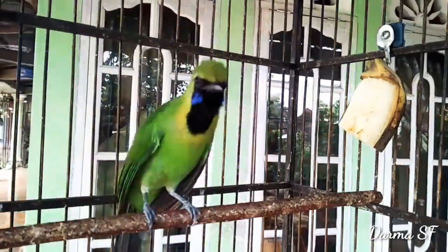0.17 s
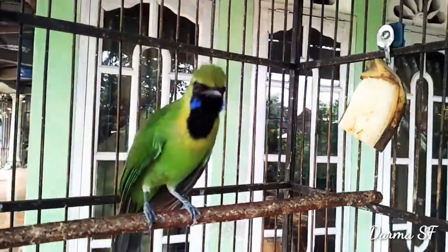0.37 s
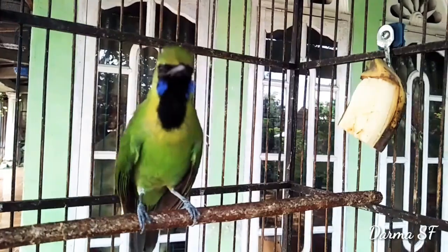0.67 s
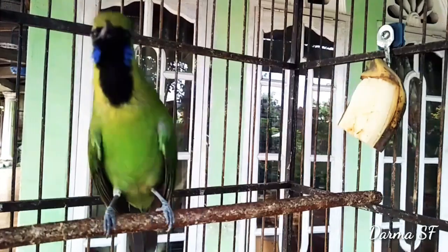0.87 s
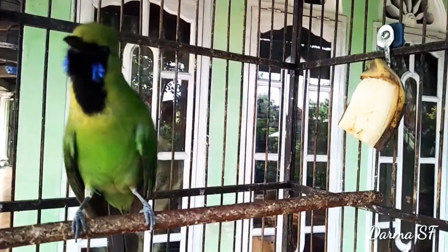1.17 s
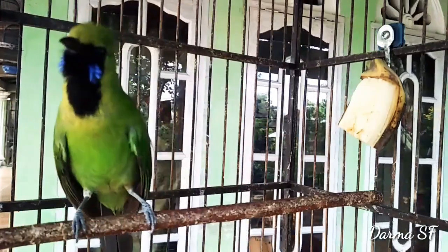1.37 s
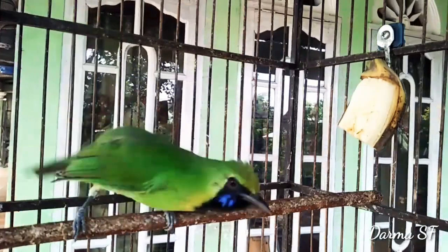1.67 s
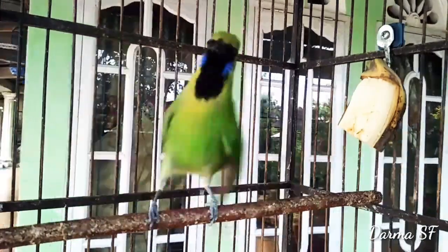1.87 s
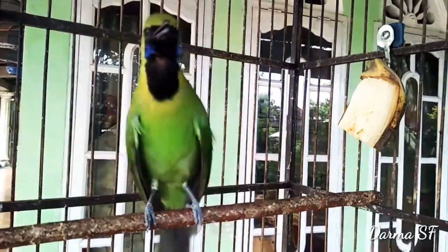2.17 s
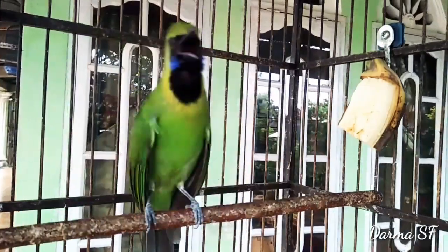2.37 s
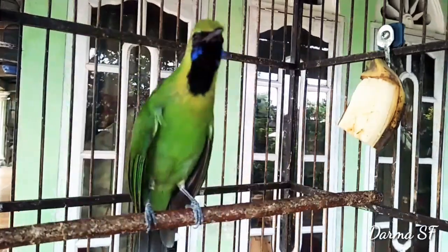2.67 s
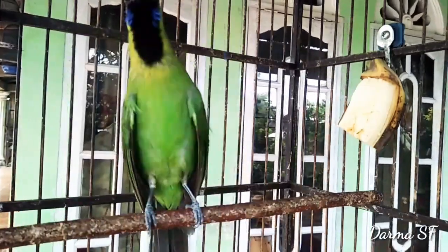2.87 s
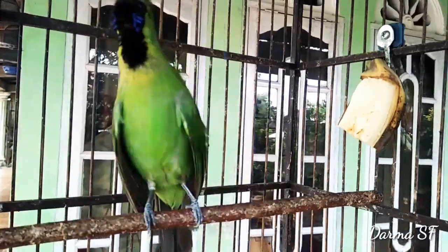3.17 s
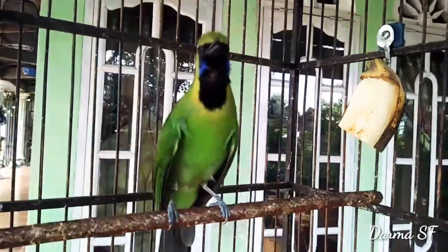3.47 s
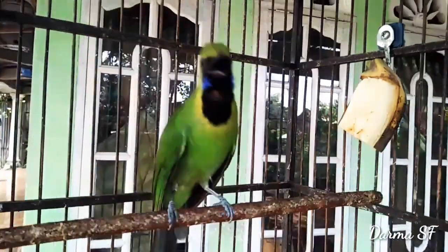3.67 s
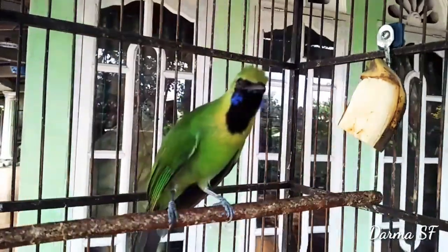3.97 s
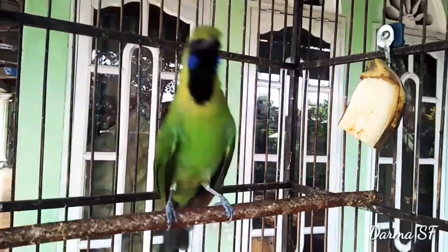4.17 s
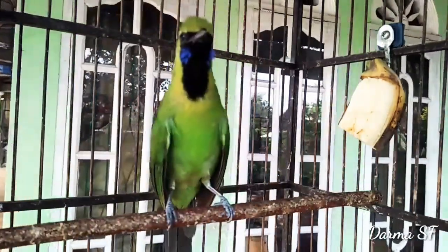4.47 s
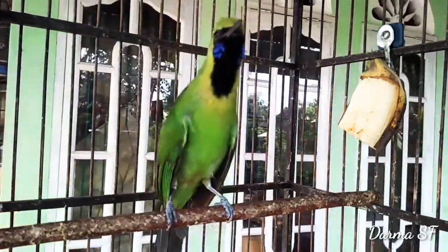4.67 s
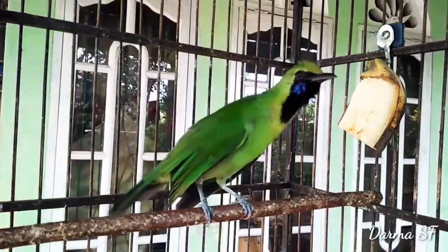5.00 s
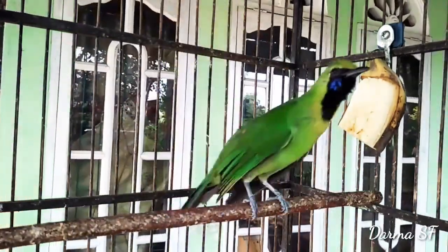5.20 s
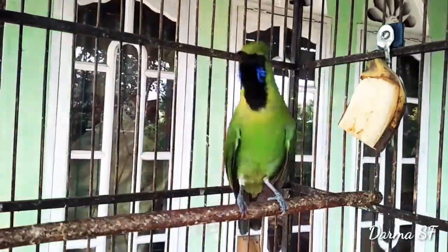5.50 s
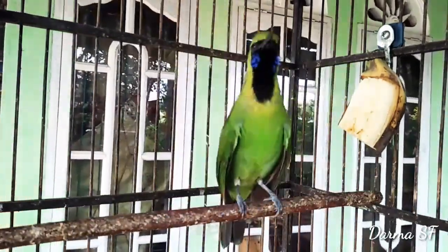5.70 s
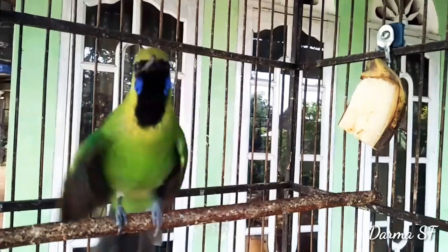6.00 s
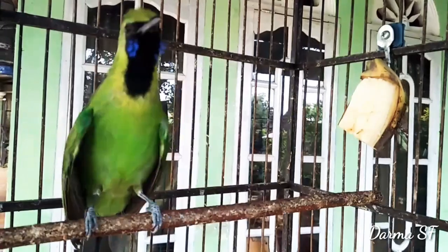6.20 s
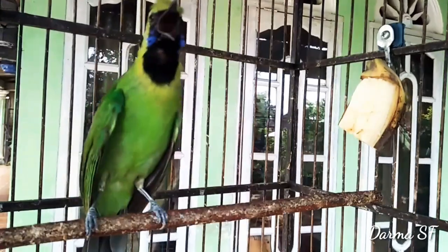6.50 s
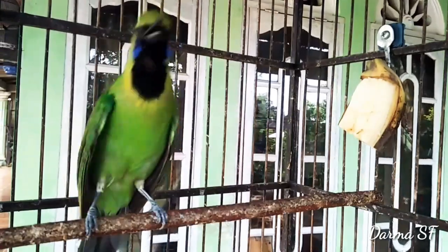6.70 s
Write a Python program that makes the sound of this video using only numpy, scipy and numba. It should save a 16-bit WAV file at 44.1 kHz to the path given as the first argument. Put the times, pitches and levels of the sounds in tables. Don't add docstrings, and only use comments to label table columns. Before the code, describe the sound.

A small songbird at arm's length from a phone microphone opens with a short loud whistle phrase, fluttering upward then stepping down. After a gap with distant birds chirping, it chatters eight rapid, rising, raspy notes, pauses, repeats a similar run of seven, and ends with five harsher, higher notes. Soft feather rustles and tiny claw ticks fall between. A hard-walled porch adds a short ring; low traffic rumbles far off.

```python
import sys
import numpy as np
from scipy import signal
from scipy.fft import rfft, irfft, next_fast_len
from scipy.io import wavfile
from scipy.ndimage import uniform_filter1d, map_coordinates
from numba import njit

SR = 44100
rng = np.random.default_rng(int(sys.argv[2]) if len(sys.argv) > 2 else 0)


def makeup_ratio(level_db):
    decades = np.asarray(level_db, float) / 20
    return 10 ** decades


def output_pcm(signal):
    pcm = np.clip(np.atleast_2d(signal).T, -1, 1) * 32767
    wavfile.write(sys.argv[1], SR, np.round(pcm).astype(np.int16))


N = 302085
T = np.arange(N) / SR


def colour(x, points):
    hz, db = np.transpose(points)
    size = next_fast_len(len(x))
    bins = np.maximum(np.arange(size // 2 + 1) * SR / size, 1)
    gain = makeup_ratio(np.interp(np.log(bins), np.log(hz), db))
    return irfft(rfft(x, size) * gain, size)[:len(x)]


def unit(x):
    return x / np.sqrt(np.mean(x ** 2))


def noise(points, size=N):
    return colour(rng.standard_normal(size), points)


def walk(rate_hz, size=N):
    hold = int(SR / rate_hz) + 1
    steps = np.repeat(rng.standard_normal(size // hold + 2), hold)
    return unit(uniform_filter1d(uniform_filter1d(steps, hold), hold)[:size])


def add(out, s, hz, partials, edge_s):
    i = int(s * SR)
    size = min(len(hz), N - i)
    phase = 2 * np.pi * (np.cumsum(hz) / SR + rng.random())
    from_start = np.arange(len(hz)) + i * (i == 0)
    to_end = np.arange(len(hz))[::-1]
    fade = np.clip(np.minimum(from_start, to_end) / (edge_s * SR), 0, 1)
    tone = 0
    for k, gain in enumerate(partials, 1):
        tone = tone + gain * np.sin(k * phase) * (k * hz < .45 * SR)
    out[i:i + size] += (np.sqrt(2) * tone * fade)[:size]


def read(table):
    s, *columns = np.transpose(table)
    t = np.arange(s[0], s[-1], 1 / SR)
    return t, [np.interp(t, s, c) for c in columns]


def bursts(table):
    total = 0
    for s, hold_s, db, fade in table:
        opening = 799.5 * np.maximum(s - T, 0)
        fading = fade * np.maximum(T - s - hold_s, 0)
        total = total + makeup_ratio(db - opening - fading)
    return total


# (time [s], pitch [Hz], level [dB], second partial [dB], third partial [dB])
WHISTLE_PATHS = [
    [(0, 3658, -11, -39.5, -34), (.025, 3653, -9.5, -33, -26), (.048, 3982, -8, -29, -39.5),
     (.061, 4459, -14, -10.5, -24.5), (.071, 4807, -21, -23, -36)],
    [(.134, 4271, -47.5, -41, -61), (.142, 4100, -31.5, -35.5, -42), (.152, 3724, -16, -36.5, -51),
     (.166, 3440, -10, -31.5, -45), (.176, 3212, -15, -41.5, -21), (.19, 3257, -17.5, -37.5, -14),
     (.204, 3263, -8.5, -34, -16), (.214, 3254, -16, -42.5, -30), (.226, 3323, -32.5, -60.5, -48)],
    [(.274, 3424, -32.5, -52, -49.5), (.28, 3369, -23, -51, -43), (.2895, 3340, -30, -46, -40),
     (.293, 2944, -13.5, -55, -33), (.304, 2694, -7.5, -44, -35.5), (.313, 2622, -15, -46, -40),
     (.32, 2423, -15.5, -52.5, -52.5), (.335, 2189, -18, -51.5, -47), (.350, 2165, -28.5, -59.5, -63.5)],
]
# (end [s], rate [Hz], pitch depth [0-1], level depth [0-1])
WHISTLE_FLUTTER = (0.054, 170, 0.035, 0.14)


def whistles():
    out = np.zeros(N)
    end_s, rate_hz, depth, throb = WHISTLE_FLUTTER
    for path in WHISTLE_PATHS:
        t, (hz, *dbs) = read(path)
        size = len(t)
        wave = np.sin(2 * np.pi * rate_hz * (t - .0015)) * np.clip((end_s - t) / 0.011, 0, 1)
        hz = uniform_filter1d(hz, 150, mode="nearest")
        hz = hz * (1 + depth * wave + 0.0024 * walk(300, size))
        lower = [makeup_ratio(db) * (1 + throb * wave + 0.13 * k * walk(500, size)) for k, db in enumerate(dbs, 1)]
        upper = [makeup_ratio(dbs[2] + below_db) * walk(600, size) for below_db in (-27, -9.5, -8.5)]
        add(out, t[0], hz, lower + upper, .003)
        i = int(t[0] * SR)
        out[i:i + size] += makeup_ratio(dbs[0] - 18) * noise(HISS_COLOUR, size)
    return out


CHATTER_PARTIALS = (-2, -26.5, -19, -28.5, -28, -27.5)


def sweep(out, s, top_hz, start_hz, end_hz, rise_s, fall_s, db):
    t = np.arange(-rise_s, fall_s, 1 / SR)
    size = len(t)
    rough = np.clip((top_hz - 2900) / 2800, .05, 1)
    bent = np.where(t > 0, fall_s * (np.abs(t) / fall_s) ** .8, t)
    hz = np.exp(np.interp(bent, [-rise_s, 0, fall_s], np.log([start_hz, top_hz, end_hz])))
    hz = uniform_filter1d(hz, 90) * (1 + 0.054 * rough * walk(900, size))
    swell_db = np.interp(t, [-rise_s, -.3 * rise_s, 0.58 * fall_s, fall_s],
                         [-14 - 5 * rough, -2 + 0.96 * rough, -6 * rough ** 2, -5 - 18 * rough])
    swell = makeup_ratio(db + swell_db + 3.8 * np.tanh(walk(350, size)))
    steady = [1 - 0.13 * rough] + [0.5 * (1 - rough)] * (len(CHATTER_PARTIALS) - 1)
    rattle = [c + np.sqrt(1 - c * c) * walk(3000, size) for c in steady]
    add(out, s - rise_s, hz, [swell * r * makeup_ratio(p) for r, p in zip(rattle, CHATTER_PARTIALS)], 0.0035)
    after = T - s + rise_s
    opening = np.clip(after / (0.8 * rise_s), 0, 1) ** 2
    closing = np.clip((rise_s + 0.02774 - after) / 0.021, 0, 1) ** 2.1
    return opening * closing * makeup_ratio(db - 17.5 + 27.52 * rough)


# (time at the top [s], top [Hz], start [Hz], level [dB])
CHATTER_NOTES = [(2.198, 3357, 1253, -10), (2.278, 3600, 1187, -11.5), (2.357, 3948, 1198, -11.5),
                 (2.438, 4180, 1208, -12.5), (2.519, 4490, 1210, -12.5), (2.6, 5373, 2012, -13),
                 (2.671, 5500, 2185, -11.5), (2.751, 5687, 2310, -15), (3.608, 3700, 1203, -12.5),
                 (3.697, 3700, 1189, -10.5), (3.779, 4200, 1194, -11), (3.860, 4300, 1210, -10.5),
                 (3.943, 4600, 1333, -12), (4.021, 5375, 2031, -11), (4.095, 5746, 2278, -14),
                 (6.586, 5270, 1274, -11), (6.641, 5811, 1300, -13), (6.699, 5834, 1090, -13),
                 (6.761, 5600, 2345, -14), (6.841, 5500, 2203, -14)]
CHATTER_FALLS = (.022, .022, .019, 0.015, 0.015, 0.012, .011, .011, 0.025, .021, .016, 0.016, 0.015, 0.0096,
                 .011, .011, .011, .011, .011, .011)
# (first pitch [Hz], last pitch [Hz], length [s], level [dB])
CHATTER_TRAILS = [(2969, 2200, .016, -18), (2895, 2400, 0.016, -20), (2949.4, 2300, .015, -15.5),
                  (2779.8, 2200, .013, -16), (3000, 2600, 0.0089, -16), (4300, 2300, 0.0095, -20),
                  (4300, 2500, .011, -19.5), (4469.5, 2700, 0.013, -26), (2950, 2200, 0.02, -19.5),
                  (2927.5, 2200, 0.017, -17.5), (2868, 2500, 0.013, -13.5), (2875, 2300, 0.0121, -15),
                  (3700, 2300, 0.00852, -17), (4496.4, 2400, 0.0097, -22), (4000, 3500, 0.012866, -15.5),
                  (4100, 2100, .011, -18), (4457.6, 3300, 0.01, -24.5), (4470, 2300, .011, -23),
                  (4200, 3600, .009, -20.5), (4500, 2500, .011, -22)]
# (frequency [Hz], level [dB])
THROAT_COLOUR = [(300, -25.5), (1000, -11), (1700, -10.5), (2250, -2.5), (2750, -0.5), (3300, -3.5),
                 (4550, -3), (5150, -12), (5500, -5.5), (7000, -8), (9700, 1.5), (12000, -5.5),
                 (14500, -13)]


def chatter():
    relaxed_hz, strained_hz = 3700, 5500
    out, easy_rasp, forced_rasp = np.zeros(N), np.zeros(N), np.zeros(N)
    for note, fall_s, trail in zip(CHATTER_NOTES, CHATTER_FALLS, CHATTER_TRAILS):
        s, top_hz, start_hz, db = note
        trail_hz, end_hz, trail_s, trail_db = trail
        strain = np.clip((top_hz - relaxed_hz) / (strained_hz - relaxed_hz), 0, 1)
        rise_s = .005 + .006 * np.log2(top_hz / start_hz)
        rasp = sweep(out, s, top_hz, start_hz, 1600, rise_s, fall_s, db)
        easy_rasp += np.sqrt(1 - strain) * rasp
        forced_rasp += np.sqrt(strain) * rasp
        sweep(out, s + 0.011, trail_hz, 0.73 * trail_hz, end_hz, 0.0021, trail_s, trail_db)
    forced_noise = noise([(1500, -19.5), (3000, -17), (3700, 2), (4300, 7), (5200, 1.5), (6000, -7.0),
                          (14000, -4)])
    easy_noise = noise([(1500, -10), (2600, -7), (3500, 15.5), (4300, -9), (6000, -6.5), (10000, 0.5),
                        (14000, -15.5)])
    rasps = (easy_rasp * easy_noise + forced_rasp * forced_noise) * makeup_ratio(4.7 * np.tanh(walk(400)))
    voice = colour(out + rasps, THROAT_COLOUR)
    comb_hz = 893
    echo = map_coordinates(colour(voice, [(6000, -4), (9000, -7)]), [np.arange(N) - SR / comb_hz])
    return makeup_ratio(-1.5) * (voice + makeup_ratio(-8) * echo)


# (time [s], peak level [dB])
OVERLOADS = [(0.046, -38), (4.021, -40.5), (4.097, -38), (6.584, -40), (6.641, -37), (6.696, -41),
             (6.758, -44.5)]


def pops():
    clicks = sum(makeup_ratio(db + 4.5) * np.exp(-((T - s) / .00025) ** 2) for s, db in OVERLOADS)
    return colour(clicks, [(60, -25), (200, -1.5), (2000, 0.5)])


# (time [s], hold [s], level [dB], release [dB/s])
CAGE_RUSTLES = [(2.172, 0.014, -47, 299), (2.965, 0.0714, -58.5, 500), (3.587, .02, -50.5, 300),
                (6.26, 0.023, -72.5, 152.5), (3.275, 0.027, -59.5, 75), (5.975, 0.055, -66, 25),
                (6.49, 0.13, -55, 202.5)]


def rustle():
    brush = unit(noise([(900, -14.5), (1500, 1.0), (2600, 1.0), (5500, -17), (7500, -38)]))
    return brush * bursts(CAGE_RUSTLES)


# (time [s], hold [s], level [dB], release [dB/s])
HISS_STIRS = [(.048, .02, -42, 499.5), (.075, .04, -55, 198), (.35, 0.046, -57.5, 124.5),
              (.45, 0.135, -79, 502.5), (1.022, 0.0097, -69, 109.5), (1.2, 0.092, -74.5, 94),
              (1.3, 0.007, -60, 91), (1.756, 0.096, -72.5, 189.5), (1.98, 0.175, -70.5, 99.5),
              (2.17, .03, -67, 298), (2.75, 0.0816, -62.5, 100), (2.988, 0.01066, -72.5, 152.5),
              (3.274, 0.106, -65.5, 402), (3.44, 0.011, -62, 372), (3.565, .05, -67, 300.5),
              (4.15, 0.087, -61.5, 183), (4.6, 0.0204, -69.5, 349), (4.93, 0.063, -69.5, 200.5),
              (5.04, 0.0097, -63.5, 86.5), (5.3, 0.13, -75, 220), (5.775, 0.0352, -63.5, 200.5),
              (5.84, 0.016, -57.5, 180), (5.99, 0.00756, -56.5, 270), (6.15, 0.69, -71.5, 201.5)]
# (time [s], peak level [dB])
CLAW_TICKS = [(1.8422, -47.5), (2.9642, -46), (3.2725, -46), (3.4347, -43.5), (5.0544, -54.5)]
# (frequency [Hz], level [dB per Hz])
HISS_COLOUR = [(2650, -36.5), (4500, -19), (5340, -17), (6520, -10), (7740, -8.5), (8920, -2), (10200, -4),
               (11100, -12.5), (14500, -19.5)]


def hiss_and_claws():
    hiss = unit(noise(HISS_COLOUR)) * makeup_ratio(3.5 + 0.75 * walk(25))
    claws = sum(makeup_ratio(db - 19.5) * (T > s) * np.exp(-np.abs(T - s) / 0.008) for s, db in CLAW_TICKS)
    return hiss * (bursts(HISS_STIRS) + makeup_ratio(-92.5) + claws)


# (time [s], length [s], first pitch
# [Hz], last pitch [Hz], level [dB])
FAR_CLEAR_NOTES = [(1.775, 0.107, 3680, 3680, -76), (6.27, 0.23, 2083, 2100, -77),
                   (1.92, 0.48, 4304, 4330, -76), (1.99, 0.188, 9010, 8450, -74.5),
                   (3.02, 0.061, 1388, 1390, -52), (3.465, 0.078, 2020, 2030, -67),
                   (5.0, 0.19, 5890, 6120, -75), (5.649, .16, 2453, 2504, -77.5),
                   (5.98, 0.044, 12380, 12200, -74), (6.092, 0.092, 2577, 2610, -61),
                   (6.31, 0.21, 870, 852, -71), (6.41, 0.35, 3585, 4090, -62)]
FAR_WARBLES = [(0, 0.087, 2480, 2024, -47.5), (.166, 0.1184, 2427, 1890, -49),
               (.345, 0.1447, 1533, 1867, -50), (.541, 0.1114, 1730, 1986, -51),
               (.36, 0.0885, 4750, 4813, -53.5), (.395, 0.0825, 5245, 5297, -44.5),
               (.425, 0.0745, 5316, 5445, -44), (.47, 0.1186, 5380, 5417, -56.5),
               (.395, 0.101, 10510, 11050, -62.5), (1.306, 0.084, 4000, 3958, -79.5),
               (1.582, 0.0907, 6890, 6610, -82.5), (1.707, 0.13, 2982, 3066, -78.5),
               (6.04, 0.085, 3604, 3674, -76), (6.42, .08, 3423, 3330, -67.5),
               (5.31, 0.15, 4480, 3775, -74), (5.396, 0.129, 3720, 3713, -80.5),
               (5.792, 0.212, 2604, 3085, -69), (6.067, 0.108, 1520, 1640, -65.5),
               (5.916, 0.097, 712, 727, -70.5), (6.438, 0.099, 1679, 1748, -64.5),
               (6.453, 0.071, 2645, 2590, -62)]
FAR_CHIRPS = [(.37, 0.0925, 5800, 6200, -51), (.93, 0.0765, 2274, 2712, -59.5),
              (.965, 0.0815, 2397, 2214, -56), (1.2, 0.0815, 2254, 2605, -52.5),
              (1.257, 0.061, 1960, 2144, -51), (1.422, 0.089, 2477, 2663, -51.5),
              (1.465, 0.072, 2077, 2056, -50.5), (1.0, 0.095, 7060, 6730, -76),
              (1.0, .08, 4893, 4790, -82.5), (1.262, 0.094, 5618, 5797, -64.5),
              (1.728, 0.107, 6635, 6440, -71), (4.9, 0.0858, 7584, 7386, -54),
              (5.013, 0.1108, 7880, 7110, -53), (5.248, .13, 7022, 6420, -70),
              (5.787, 0.126, 4810, 4345, -67), (5.8, 0.1154, 8680, 6820, -61.5),
              (5.949, 0.084, 4905, 4580, -64), (5.958, 0.069, 7290, 6270, -52),
              (6.069, 0.091, 2990, 3332, -61), (.144, .028, 10390, 10100, -43),
              (6.245, .06, 505, 431, -62.5)]


def neighbours():
    out = np.zeros(N)
    kinds = [(FAR_CLEAR_NOTES, 0.016, 1.02), (FAR_WARBLES, 0.043, 0.79), (FAR_CHIRPS, .12, 0.62)]
    for notes, blur, steady in kinds:
        for s, length_s, first_hz, last_hz, db in notes:
            share = np.arange(0, 1, 1 / (length_s * SR))
            size, blur_hz = len(share), blur * first_hz
            swell = makeup_ratio(db - 20 * np.abs(share - .3) ** 2.9) * (steady + walk(2.0 * blur_hz, size))
            glide_hz = first_hz + (last_hz - first_hz) * share ** 0.66
            add(out, s, glide_hz + 0.23 * blur_hz * walk(65, size), [swell], .02)
    return out


# (time [s], level [dB])
HORN_SWELL = [(5.98, -75.5), (6.1, -72.5), (6.3, -75.5), (6.45, -75), (6.6, -59.5)]
HORN_PARTIALS = (-21, -27.5, -3.5, -6.5, -8, -25, -17, -20.5, -26, -15, -25, -30.5, -24.5, -17.5, -16, -20,
                 -23.5, -18, -18.5, -16.5, -23.5, -18)


def horn():
    out = np.zeros(N)
    t, (db,) = read(HORN_SWELL)
    partials = [makeup_ratio(db + p + 4.9 * walk(15.81, len(t))) for p in HORN_PARTIALS]
    add(out, t[0], np.full(len(t), 526.0), partials, .02)
    return out


# (frequency [Hz], level [dB per Hz])
TOWN_COLOUR = [(94, -39.5), (160, -10.5), (293, -3), (374, -20.5), (433, -2.5), (516, -13), (552, -5),
               (685, -7), (753, -2), (1170, -5), (2100, -16), (2970, -29.5), (4000, -35), (5200, -68.5),
               (8800, -120)]
# (frequency [Hz], width [Hz], level [dB])
TOWN_HUMS = [(319.3, 93, -11), (440.6, 41, -9.5), (590, 37, -13.5), (890, 32, -8.5)]


def town():
    s, db, _ = np.transpose(TRAFFIC_PASSES)
    traffic_db = np.interp(T, s, db)
    murmur = unit(noise(TOWN_COLOUR)) * makeup_ratio(0.37 * walk(3.7))
    for hz, width_hz, db in TOWN_HUMS:
        murmur += makeup_ratio(db + 1.9 * walk(3.4)) * walk(width_hz) * np.sin(2 * np.pi * hz * T)
    return murmur * makeup_ratio(-65 + 0.29 * (traffic_db - traffic_db.mean()))


# (time [s], level [dB], engine note [Hz])
TRAFFIC_PASSES = [(0, -53.5, 92.32), (.25, -59.5, 90.99), (0.611, -54.5, 92.05), (1.39, -57.5, 92.05),
                  (1.9, -65.5, 91.61), (2.361, -57, 100.6), (2.8, -60, 93.28), (2.92, -52, 89.35),
                  (3.45, -58, 88.41), (3.6, -63.5, 92.26), (4.4, -64, 104.7), (4.75, -63.5, 107.1),
                  (5.13, -59, 107.8), (5.42, -67, 110), (5.65, -64, 111), (5.93, -63, 86.23),
                  (6.45, -61, 112.2), (6.85, -65.5, 106.4)]
# (frequency [Hz], level [dB per Hz])
RUMBLE_COLOUR = [(18, -40.5), (30, -11), (97, 1.5), (220, -16.5), (290, -53.5), (480, -120)]


def traffic():
    s, *columns = np.transpose(TRAFFIC_PASSES)
    level_db, engine_hz = (np.interp(T, s, c) for c in columns)
    engine = np.sin(2 * np.pi * np.cumsum(engine_hz) / SR) * makeup_ratio(2 * walk(9.9))
    return (unit(noise(RUMBLE_COLOUR)) + engine * makeup_ratio(-3.0)) * makeup_ratio(level_db)


@njit
def walls(x, lags, gain, damp):
    line, soft, out = np.zeros((8, 4096)), np.zeros(8), np.zeros(len(x))
    for i in range(len(x)):
        total = 0.
        for k in range(8):
            soft[k] += (1 - damp) * (gain[k] * line[k, (i - lags[k]) & 4095] - soft[k])
            total += soft[k]
        out[i] = total
        for k in range(8):
            line[k, i & 4095] = x[i] + soft[k] - total / 4
    return out


def space(x, t60_s, damp):
    lags = rng.integers(250, 1900, 8)
    return walls(x + 1e-18, lags, makeup_ratio(-60 * lags / SR / t60_s), np.clip(damp, 0, .9)) / 2


def scene():
    bird, far = whistles() + chatter(), neighbours() + horn()
    to_wall = makeup_ratio(5.5 * (T > 6.5))
    porch = makeup_ratio(-14.5) * space(bird * to_wall, t60_s=0.2369, damp=0.34)
    yard = makeup_ratio(-7.5) * space(far, t60_s=0.4, damp=0.68)
    near = bird + porch + pops() + rustle() + hiss_and_claws()
    return (near + makeup_ratio(4.5) * far + yard + town() + traffic())[None]


def top_cut(x):
    return signal.sosfilt(signal.butter(12, 14610, fs=SR, output="sos"), x)


def record(dry):
    low_pass = signal.ellip(10, .3, 72, 14250, fs=SR, output="sos")
    shaved = colour(.8 * np.tanh(dry[0] / .8) - dry[0], [(500, -30), (1500, 0), (14000, 0)])
    mix = signal.sosfilt(low_pass, dry + shaved)
    return top_cut(mix)


dry = scene()
out = record(dry)
output_pcm(out)
```